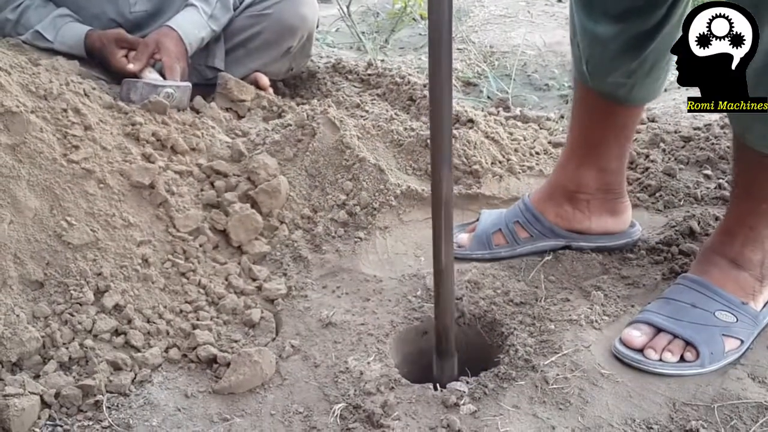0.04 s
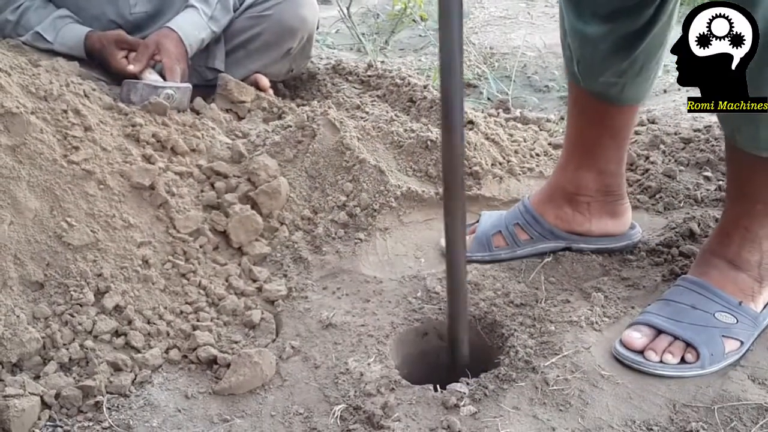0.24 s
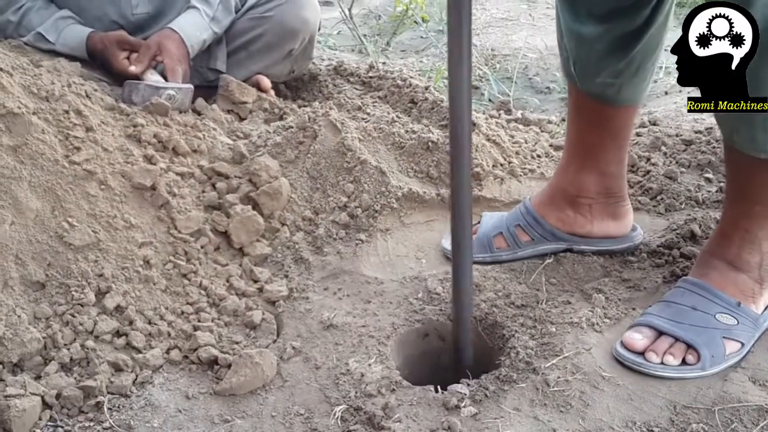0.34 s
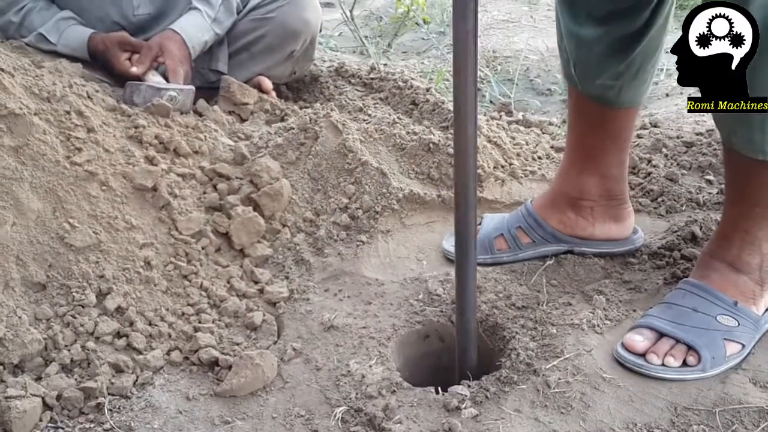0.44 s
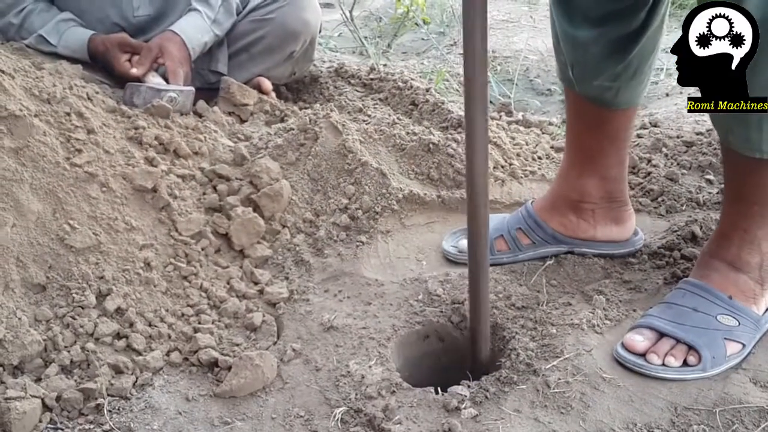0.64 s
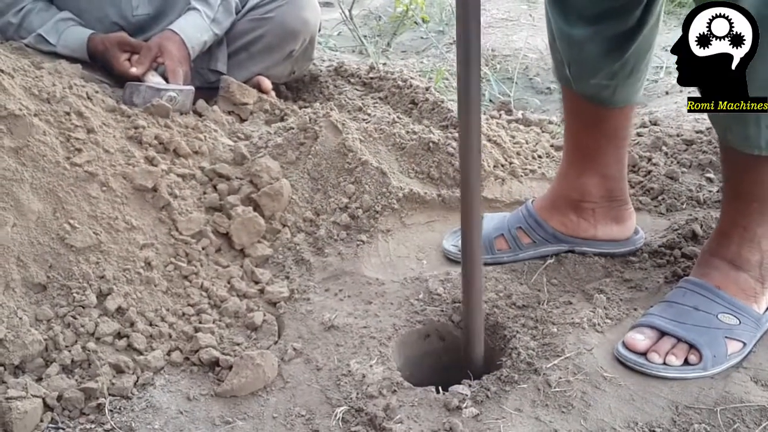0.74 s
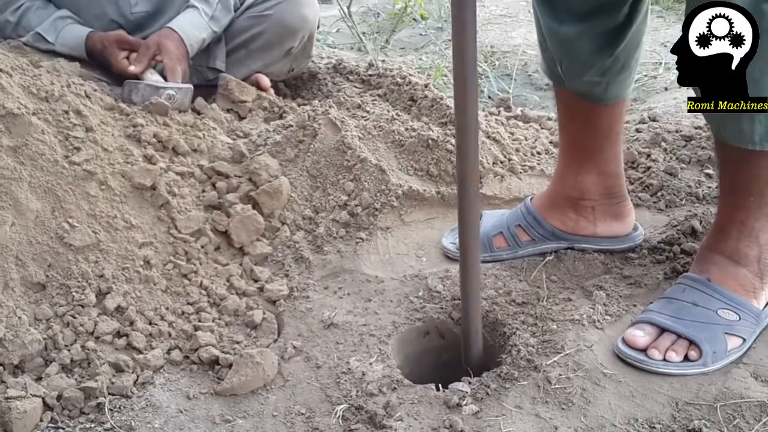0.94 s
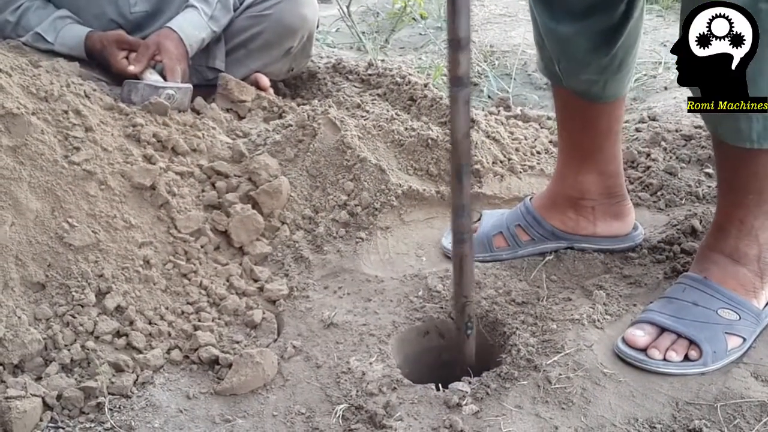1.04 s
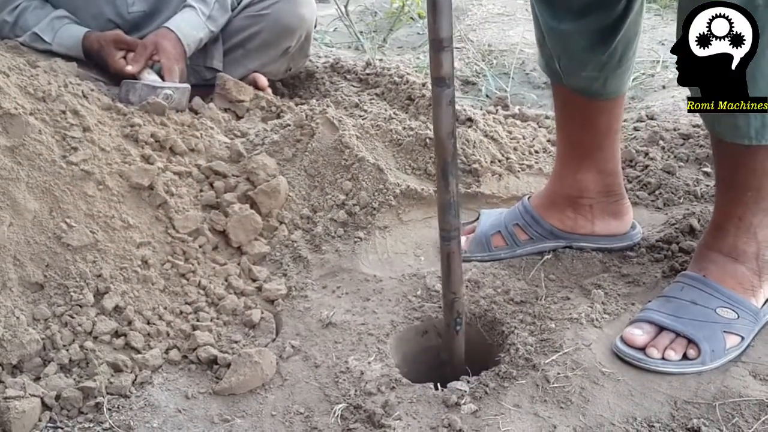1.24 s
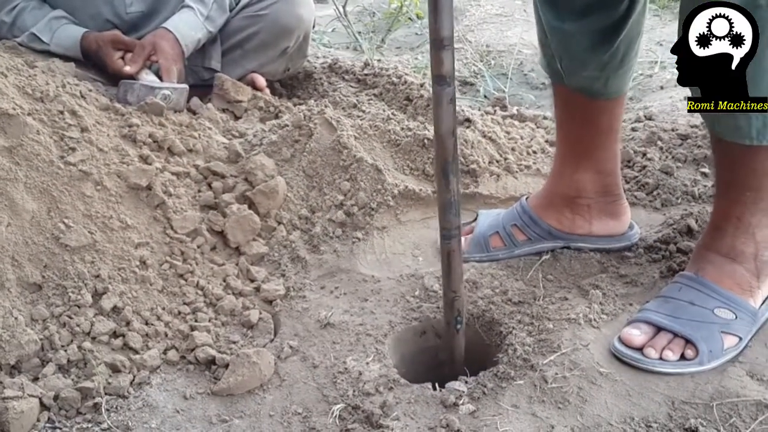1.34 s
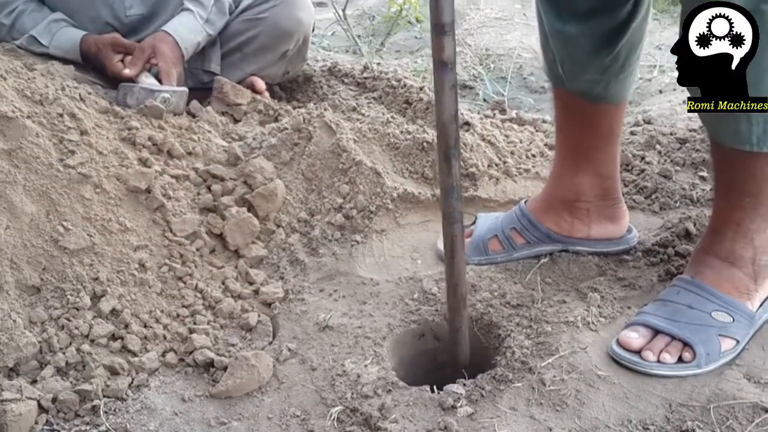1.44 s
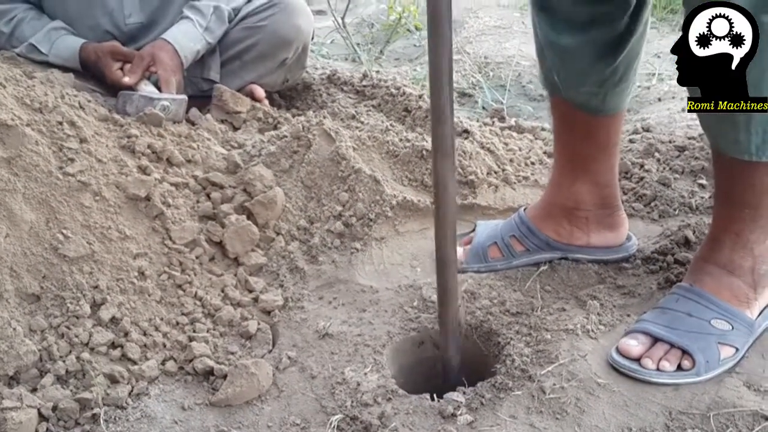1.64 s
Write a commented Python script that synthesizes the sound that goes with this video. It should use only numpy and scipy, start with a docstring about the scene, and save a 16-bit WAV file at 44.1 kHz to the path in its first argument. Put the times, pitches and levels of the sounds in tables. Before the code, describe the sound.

Iron pipe jabbed into a hole in dry soil, with gritty scraping, thuds and a clank.

```python
"""A long iron pipe works in a hole in dry earth, close by and outdoors. Loose soil hisses along it and
the iron rubs the side. Jabs crunch the earth and ring the pipe's bending modes; its weight lands with
dull thuds and a low shudder. Last, hard contacts clank and rattle briefly. Rough, narrow tones add rim
squeaks, a hollow ring and the pipe's high fluttering ring after blows. A low rumble lies underneath."""
import sys
import numpy as np
from scipy import signal
from scipy.fft import rfft, irfft, next_fast_len
from scipy.io import wavfile
from scipy.ndimage import uniform_filter1d, map_coordinates

SR = 44100
rng = np.random.default_rng(int(sys.argv[2]) if len(sys.argv) > 2 else 0)


def wav_record(signal):
    """Record a signal, one row per channel, as 16-bit PCM in the file named by sys.argv[1]."""
    frames = np.transpose(np.atleast_2d(signal))
    bounded = np.clip(frames, -1, 1)
    # unit amplitude maps onto the largest positive 16-bit level
    quanta = np.round(bounded * 32767).astype(np.int16)
    wavfile.write(sys.argv[1], SR, quanta)


N = 74970

# Envelopes: t/s, level/dB
SOIL_ENVELOPE = [(0.0, -50.5), (0.062, -42.5), (0.118, -47.5), (0.148, -39), (0.23, -31), (0.294, -36.5),
                 (0.338, -30.5), (0.604, -29.5), (0.618, -21), (0.63, -28.5), (0.824, -29.5),
                 (0.902, -25.5), (1.06, -31), (1.13, -26.5), (1.182, -44.5), (1.19, -34.5), (1.286, -68),
                 (1.34, -57), (1.52, -67), (1.586, -57), (1.596, -45.5), (1.672, -51), (1.7, -58)]  # soil sliding along the pipe
RUB_ENVELOPE = [(0, -54), (.12, -50), (.22, -38.5), (.45, -39.5), (.55, -32.5), (.8, -40), (1.08, -39),
                (1.13, -30.5), (1.27, -53.5), (1.57, -56), (1.6, -43.5), (1.7, -42.5)]  # iron on the hole's side
SHUDDER_ENVELOPE = [(0, -75), (.6, -76), (.63, -41), (.78, -48.5), (1, -50), (1.12, -60), (1.16, -33),
                    (1.23, -48), (1.33, -46), (1.37, -60), (1.7, -70)]  # pipe shaking in the hole

# Rim squeaks, hollow ring, high pipe ring: t/s, level/dB, f/Hz, length/s, glide/(Hz/s)
ROUGH_TONES = [(0.221, -47, 920, 0.032, 0), (.26, -43, 2147, 0.086, -5), (.47, -41, 1800, 0.086, 0),
               (0.607, -31, 1052, 0.065, -3), (.688, -17, 1936, 0.017, 5000), (0.701, -25, 2077, 0.07, 0),
               (1.1, -32, 1737, 0.035, 17000), (1.138, -51.5, 5530, 0.2, 3), (1.399, -43.5, 5560, 0.18, -3)]
# Jabs into earth: t/s, crunch/dB, t60/s, tilt/(dB/oct), ring/dB, ring centre/Hz, fall-off/(dB/oct^2)
JABS = [(.609, -22.5, 0.6, 0.5, -37, 1730, 4.5), (0.691, -23.5, 0.46, -0.5, -34, 2340, 5),
        (1.127, -26.5, 0.32, -4.5, -35, 714, 0.93)]
# Soft landings: t/s, level/dB, mid-thud f/Hz, length/s
THUDS = [(.6095, -16.5, 208, 0.01), (0.617, -29, 205, 0.014), (0.695, -21.5, 211, 0.0098),
         (1.126, -26, 588, .011), (1.132, -11, 172, 0.0055), (1.137, -23.5, 85, 0.015),
         (1.151, -14, 142, 0.014)]
# Hard contacts: t/s, clatter/dB, t60/s, crack/dB, ring/dB, ring centre/Hz, fall-off/(dB/oct^2)
CLANKS = [(1.3545, -20, 0.29, -13.5, -28, 2970, 8), (1.3901, -17.5, 0.17, -32, -24.5, 3200, 5),
          (1.4175, -40, 0.068, -36, -39.5, 2850, 2)]

# Noise spectra: f/Hz, relative level/dB
SOIL_SPECTRUM = [(1470, -54), (2500, -18), (2780, -9.5), (3170, -22), (3580, -6), (3890, -11.5),
                 (4430, -5.5), (6950, -4.5), (8740, 2.5), (11400, -5), (15500, -11)]
RUB_SPECTRUM = [(200, -20), (700, -9), (1500, -10.5), (2100, 3.5), (2500, -9), (2900, 1.5), (4000, -9),
                (7000, 0.5)]
RUMBLE_SPECTRUM = [(20, -27), (45, -18), (65, -4.5), (100, 0), (160, -8), (300, -11), (450, -20),
                   (1500, -22.5), (5000, -22.5), (15000, -51)]
SHUDDER_SPECTRUM = [(50, -7), (110, 2.5), (250, 0), (350, 1), (480, -12.5), (800, -7.5), (1500, -60)]
CRUNCH_SPECTRUM = [(30, -36), (100, -14), (180, 6), (300, -47), (500, -6.5), (1100, 0.5), (1600, 1.5),
                   (2100, 2), (3300, 1.5), (5000, 2.5), (9000, 0), (15000, -18)]
CLATTER_SPECTRUM = [(290, -68), (500, -19), (610, -16), (661, -38), (998, -26), (1550, 4), (1940, -14),
                    (2400, 3.5), (2740, -29), (3260, -1.5), (5060, -2.5), (8720, -4), (12000, -20),
                    (15600, -50), (22000, -120)]
CRACK_SPECTRUM = [(600, -53), (1300, -8), (2600, -4), (4500, -16), (7000, -2.5), (10000, 0.5), (15500, -14)]

# Pipe bending modes: f/Hz, level/dB
PIPE_MODES = [(177, 0), (253, 3), (305, -2), (360, -3), (484, -4), (622, -1), (775, -5), (860, -7),
              (953, -2), (1046, 0), (1130, -3), (1215, -5), (1300, 0), (1400, -2), (1483, 5), (1597, 2),
              (1690, -3), (1790, -6), (1880, -7), (1987, -3), (2104, 0), (2230, -8), (2336, 3), (2470, -6),
              (2597, 1), (2740, -4), (2875, 0), (3042, 4), (3181, 5), (3326, 6), (3490, -9), (3644, 4),
              (3793, 0), (3949, -1), (4107, -1), (4290, -2), (4480, -6), (4985, -14), (5150, -11),
              (5610, -17)]
# Mode decay: f/Hz, t60/s
PIPE_T60 = [(177, 0.74), (300, 0.82), (620, 0.59), (1100, 0.16), (1500, 0.22), (2400, 0.14), (3300, 0.19),
            (4500, 0.18), (5200, 0.12), (5600, 1)]

# Stereo balance: f/Hz, left minus right/dB
SLIDE_PAN = [(60, 8), (99, -13), (160, 23), (270, 6), (450, 7), (740, -2.5), (1220, 2.5), (2010, -2),
             (3330, -0.5), (5500, -0.5), (9080, 18.5), (15000, 16.5)]  # soil and rubbing
HIT_PAN = [(100, 3), (400, 5.5), (800, 1.5), (1300, 2.5), (2400, -1), (4400, -1.5), (6000, 2), (8100, 11),
           (11000, 22), (15000, 22)]  # all other sounds
# Likeness of the two microphones: f/Hz, coherence/1
COHERENCE = [(100, .99), (300, .95), (600, .65), (1500, .6), (3000, .45), (5000, .2), (8000, .05),
             (12000, 0)]

GRIT_DB, SOIL_GRIT_DB, CRACKLE_GRIT_DB = 2, 1, 8.5
HISS_DB, CRACKLE_DB, RUMBLE_DB, PATCHY_DB = 2.5, -10.5, -48.5, 2.5
SING_DB, SING_WIDTH_HZ, MODE_SCATTER_DB = -0.5, 30, 3
TONE_FLUTTER_DB, TONE_JITTER_RAD = 1.4, 0.69
ATTACK_S, CRACK_T60_S = 0.0015, 0.14
THUD_SAG = 0.44  # drop in ln(f) per thud length
LEFT_LEAD_S, CEILING, TOP_HZ = 35e-6, 0.54, 15700


def amp(db):
    """Decibels to gain."""
    return 10 ** (np.asarray(db) / 20)


def unit_rms(x):
    """Scale to rms 1."""
    return x / np.sqrt(np.mean(x ** 2) + 1e-20)


def at_hz(table, hz):
    """Interpolate on a log frequency axis."""
    knots_hz, values = np.transpose(table)
    return np.interp(np.log(hz + 1), np.log(knots_hz + 1), values)


def since(start_s):
    """Seconds since start_s, zero before."""
    return np.maximum(np.arange(N) / SR - start_s, 0)


def envelope(table):
    """Gain per sample from t/s, level/dB rows."""
    return amp(np.interp(since(0), *np.transpose(table)))


def wobble(rate_hz):
    """Smooth random curve, rate_hz knots a second."""
    return map_coordinates(rng.standard_normal(N // 4), [np.arange(N) * rate_hz / SR], mode="wrap")


def filtered(x, response):
    """Apply response(hz) by FFT."""
    size = next_fast_len(N + 8192)
    return irfft(rfft(x, size) * response(np.fft.rfftfreq(size, 1 / SR)), size)[..., :N]


def panned(x, pan):
    """Constant-power pan per frequency."""
    def gains(hz):
        balance_db = at_hz(pan, hz)
        return amp(np.outer([.5, -.5], balance_db)) / np.sqrt(np.cosh(balance_db * np.log(10) / 20))
    return filtered(x, gains)


def grit(spectrum, grain_db=GRIT_DB):
    """Stereo noise of rms 1 in tiny grains; grain_db sets the clumping."""
    def mid_side_gains(hz):
        angle = np.arccos(np.clip(at_hz(COHERENCE, hz), 0, 1)) / 2
        return amp(at_hz(spectrum, hz)) * [np.cos(angle), np.sin(angle)]
    grains = rng.standard_normal((2, N)) * amp(grain_db * (wobble(2500) + 0.43 * wobble(250)))
    mid, side = filtered(grains, mid_side_gains)
    return unit_rms(np.array([mid + side, mid - side]))


def patchy(x):
    """Resonances of a rubbing contact come and go."""
    frames = signal.stft(x, nperseg=1024)[2]
    patches = uniform_filter1d(rng.standard_normal(frames.shape[1:]), size=4, axis=0)
    patches = uniform_filter1d(patches, size=7, axis=1)
    frames *= amp(PATCHY_DB * unit_rms(patches))
    return unit_rms(signal.istft(frames)[1][:, :N])


def strike(start_s, t60_s):
    """Fast rise, exponential decay."""
    t = since(start_s)
    return (1 - np.exp(-t / ATTACK_S)) * np.exp(-np.log(1000) * t / t60_s)


def swell(start_s, length_s):
    """One rounded push."""
    return np.sin(np.pi * np.minimum(since(start_s) / length_s, 1) ** 0.72)


def sliding_soil():
    """Dry soil hisses and crackles along the pipe."""
    hiss = amp(HISS_DB) * patchy(grit(SOIL_SPECTRUM, SOIL_GRIT_DB))
    crackle = amp(CRACKLE_DB) * grit(SOIL_SPECTRUM, CRACKLE_GRIT_DB)
    return envelope(SOIL_ENVELOPE) * (hiss + crackle)


def rubbing_iron():
    """Iron rubs the hole's side; the friction makes the pipe's modes sing."""
    def resonances(hz):
        damping = 1j * hz * SING_WIDTH_HZ
        return sum(damping / (mode_hz ** 2 - hz ** 2 + damping) for mode_hz, _ in PIPE_MODES)
    friction = patchy(grit(RUB_SPECTRUM))
    singing = amp(SING_DB) * unit_rms(filtered(friction, resonances))
    return envelope(RUB_ENVELOPE) * unit_rms(friction + singing)


def outdoor_rumble():
    """Low, wavering outdoor noise."""
    return amp(RUMBLE_DB + wobble(11.5)) * grit(RUMBLE_SPECTRUM, grain_db=3)


def rough_tones():
    """Rough, narrow tones: rim squeaks, a hollow ring, and the pipe's high fluttering ring after blows."""
    out = np.zeros(N)
    for start_s, db, hz, length_s, glide_hz_per_s in ROUGH_TONES:
        t = since(start_s)
        gain = amp(db + TONE_FLUTTER_DB * wobble(300)) * swell(start_s, length_s)
        phase = 2 * np.pi * (hz + glide_hz_per_s * t / 2) * t
        out += gain * np.sin(phase + TONE_JITTER_RAD * wobble(350))
    return out


def shudder():
    """The pipe shakes in the hole: low noise."""
    return envelope(SHUDDER_ENVELOPE) * grit(SHUDDER_SPECTRUM)


def pipe_ring(start_s, centre_hz, falloff):
    """Struck bending modes; the contact favours those near centre_hz."""
    out = np.zeros((2, N))
    for hz, db in PIPE_MODES:
        phase = rng.uniform(0, 2 * np.pi)
        spread_rad = np.arccos(at_hz(COHERENCE, hz)) * rng.choice([-1, 1])
        stereo_phase = phase + spread_rad * np.array([[.5], [-.5]])
        mode_db = db - falloff * np.log2(hz / centre_hz) ** 2 + MODE_SCATTER_DB * rng.standard_normal()
        tone = np.sin(2 * np.pi * hz * since(start_s) + stereo_phase)
        out += amp(mode_db) * tone * strike(start_s, at_hz(PIPE_T60, hz))
    return out


def jabs():
    """Earth crunches under the rim and sets the pipe humming."""
    out = np.zeros((2, N))
    for start_s, crunch_db, t60_s, tilt, ring_db, centre_hz, falloff in JABS:
        spectrum = [(hz, db + tilt * np.log2(hz)) for hz, db in CRUNCH_SPECTRUM]
        out += amp(crunch_db) * strike(start_s, t60_s) * grit(spectrum)
        out += amp(ring_db) * pipe_ring(start_s, centre_hz, falloff)
    return out


def thuds():
    """The ground gives briefly under the pipe's weight, sagging in pitch."""
    out = np.zeros(N)
    for start_s, db, hz, length_s in THUDS:
        t = since(start_s)
        pitch_hz = hz * np.exp(-THUD_SAG * (np.minimum(t / length_s, 2) - .5))
        phase = 2 * np.pi * np.cumsum(pitch_hz * (t > 0)) / SR
        out += amp(db) * swell(start_s, length_s) * np.sin(phase)
    return out


def clanks():
    """Hard contacts: dense clatter, bright crack, short pipe ring."""
    out = np.zeros((2, N))
    for start_s, clatter_db, t60_s, crack_db, ring_db, centre_hz, falloff in CLANKS:
        out += amp(clatter_db) * strike(start_s, t60_s) * grit(CLATTER_SPECTRUM)
        out += amp(crack_db) * strike(start_s, CRACK_T60_S) * grit(CRACK_SPECTRUM)
        out += amp(ring_db) * pipe_ring(start_s, centre_hz, falloff)
    return out


def scene():
    """The pipe over a low outdoor rumble."""
    lows = outdoor_rumble() + shudder()
    slide = sliding_soil() + rubbing_iron()
    contacts = jabs() + clanks() + thuds() + rough_tones()
    return panned(slide, SLIDE_PAN) + panned(contacts + lows, HIT_PAN)


def record(dry):
    """Left microphone leads; peaks are rounded, then the band is cut at TOP_HZ."""
    heard = filtered(dry, lambda hz: np.exp(1j * np.pi * LEFT_LEAD_S * np.outer([1, -1], hz)))
    rounded = heard / (1 + (heard / CEILING) ** 4) ** .25
    return filtered(rounded, lambda hz: hz < TOP_HZ)


dry = scene()
out = record(dry)
wav_record(out)
```